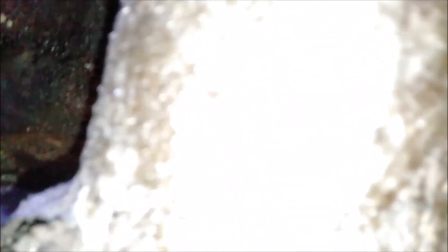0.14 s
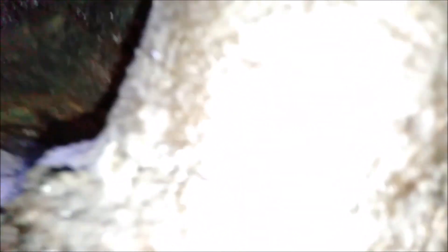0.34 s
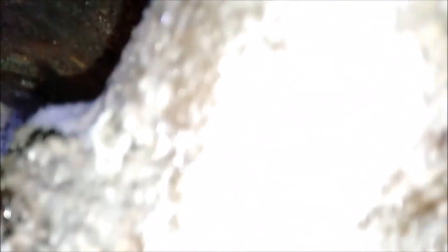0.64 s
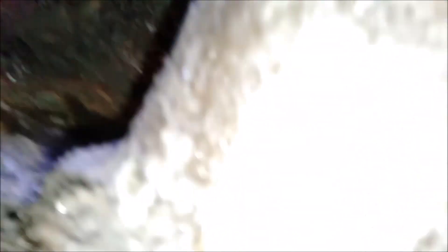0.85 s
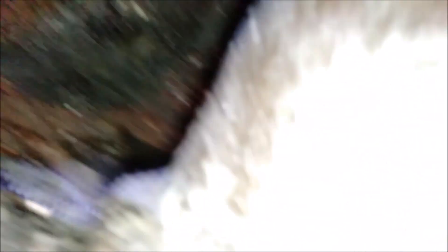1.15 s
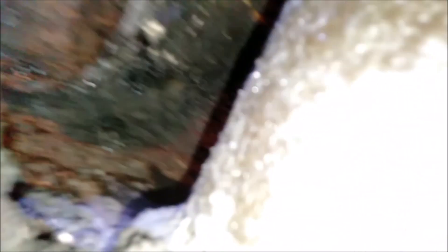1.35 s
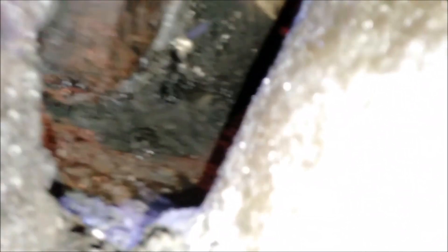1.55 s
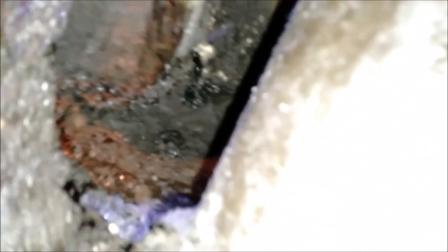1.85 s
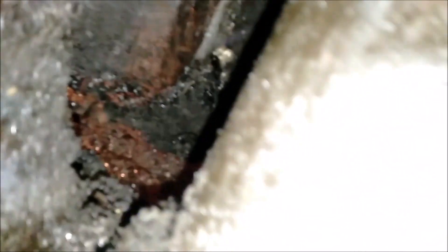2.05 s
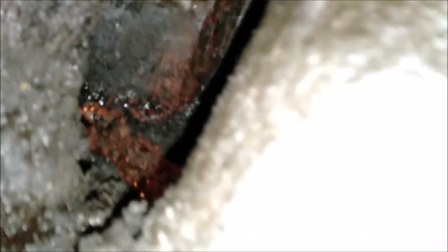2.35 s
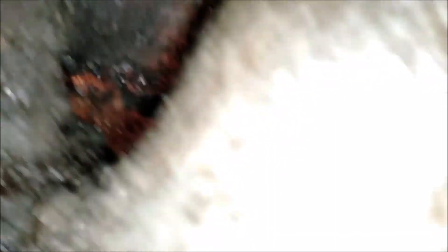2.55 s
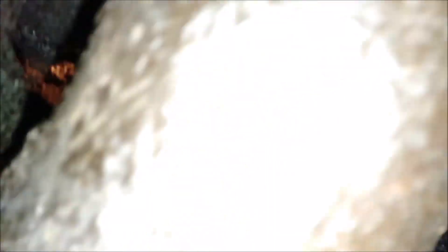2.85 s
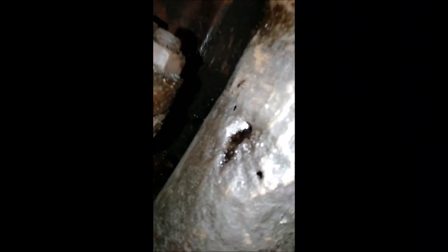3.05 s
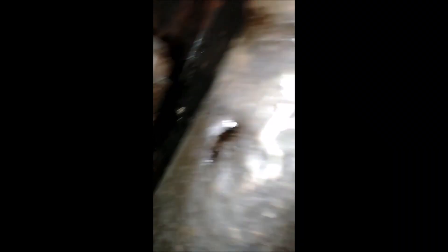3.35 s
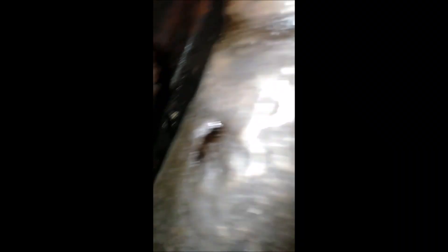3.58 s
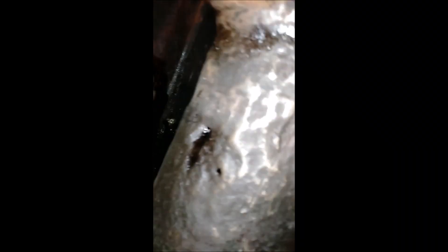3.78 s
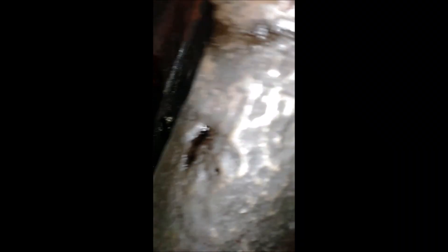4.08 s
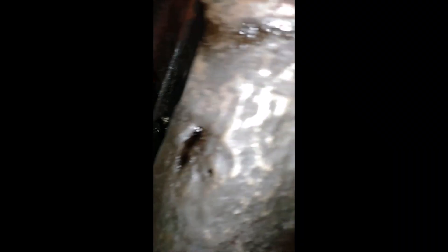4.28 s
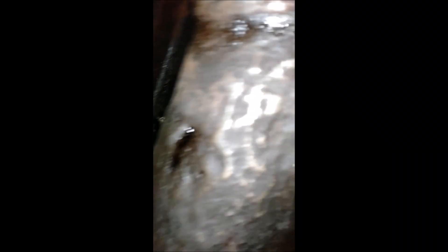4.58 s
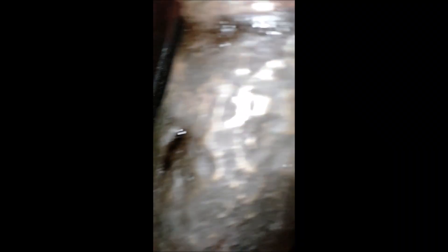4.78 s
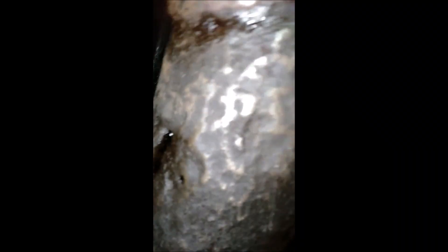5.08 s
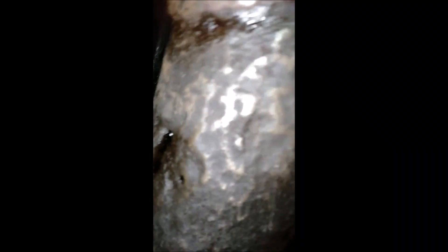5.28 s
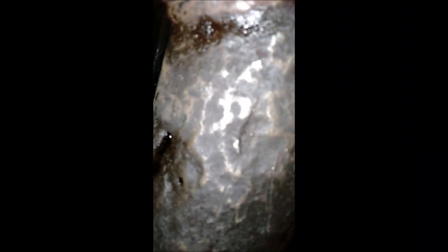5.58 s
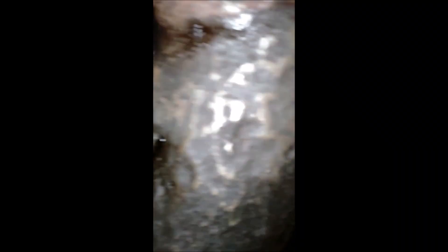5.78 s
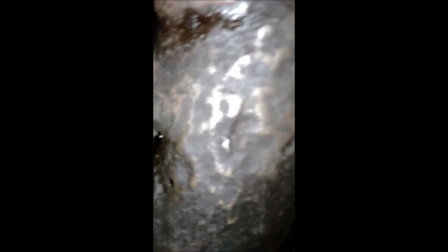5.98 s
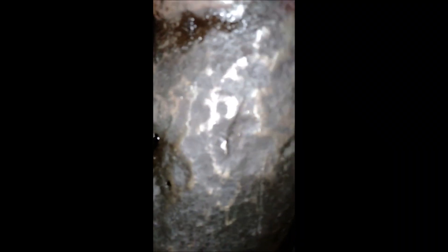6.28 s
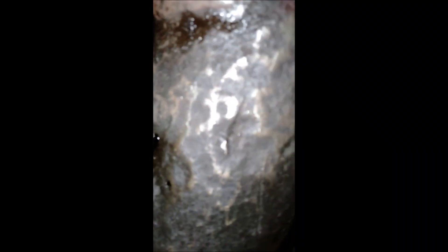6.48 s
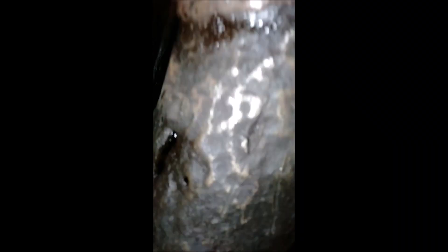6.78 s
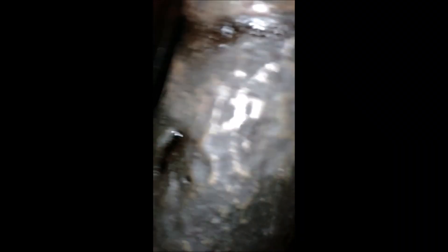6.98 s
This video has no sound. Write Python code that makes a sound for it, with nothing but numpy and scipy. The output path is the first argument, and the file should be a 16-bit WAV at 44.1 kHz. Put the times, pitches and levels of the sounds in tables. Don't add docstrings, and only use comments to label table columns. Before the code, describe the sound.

Close to machinery in a steel engine room, a six-cylinder diesel clatters fast and steadily, with a vane pump whining and thin air hissing. It breaks off with a snap. After about a quarter second of silence a click opens the same noise at quarter speed: deep, dark, throbbing rumble with dull hiss, continuing to the end.

```python
import sys
import numpy as np
from scipy import signal
from scipy.fft import rfft, irfft, next_fast_len
from scipy.io import wavfile
from scipy.ndimage import uniform_filter1d

SR = 44100
rng = np.random.default_rng(int(sys.argv[2]) if len(sys.argv) > 2 else 0)


def generate_wav(signal):
    frames = np.transpose(np.atleast_2d(signal))
    scaled = np.clip(frames, -1, 1) * 32767
    pcm = np.round(scaled).astype(np.int16)
    wavfile.write(sys.argv[1], SR, pcm)


def volts(x):
    e = np.asarray(x, float) / 20
    return 10 ** e


N = 314428
PADDED = next_fast_len(N)
CYCLE_HZ = 5.9567


def diesel(colour, slow, take, rest_db, blur_db, wander_cycles):
    strong_multiples = [(5, -38, -37, 0), (10, -39, -37, 5), (12, -34, -34, -3), (14, -35, -36, 1),
                        (18, -30, -29, -1), (20, -32, -34, 1), (21, -36, -35, 2), (24, -32, -36, 1),
                        (25, -40, -34, 5), (31, -42, -36, 3), (35, -41, -36, 3), (36, -35, -34, -3),
                        (39, -39, -37, -6), (42, -30, -29, 0),
                        (82, -34, -38, 7), (84, -31, -32, 0), (85, -36, -31, 4), (86, -46, -36, -12),
              (87, -37, -34, -7), (90, -39, -33, -4), (94, -39, -40, -3), (99, -38, -35, -2),
              (140, -44, -48, -8), (149, -46, -43, -2), (160, -43, -40, 4), (162, -43, -40, 4),
              (165, -54, -42, -3), (174, -47, -43, 0)]
    firing_lift_db, half_firing_lift_db = 5.5, 2.5
    lift_fades_at = 110.
    place_swing_db = 2.5
    k, size = np.arange(600), 2 ** 15
    phases = np.exp(2j * np.pi * rng.random(len(k)))
    turns = CYCLE_HZ / slow * np.arange(N) / SR + wander_cycles * drift(1.5 / slow)
    firing, half_firing = k % 6 == 0, k % 6 == 3
    strong = np.array(strong_multiples)
    if take == 1:
        gain_db = strong[:, 3]
    else:
        gain_db = 2 * place_swing_db * rng.standard_normal(len(strong))
    loops = []
    for place in (-.5, .5):
        uneven_db = np.clip(rng.normal(0, 2.8, len(k)), -12, 5.)
        lift_db = firing_lift_db * firing + half_firing_lift_db * half_firing
        lift_db = lift_db / (1 + (k / lift_fades_at) ** 4)
        colour_db = at_hz(colour, k * CYCLE_HZ / slow)
        level = volts(rest_db + colour_db + uneven_db + lift_db - blur_db * k / 100)
        level[strong[:, 0]] = volts(strong[:, take] + place * gain_db)
        cycle = irfft(level * (k > 2) * phases, size) * size / np.sqrt(2)
        closed = np.append(cycle, cycle[0])
        loops.append(np.interp(turns % 1, np.arange(size + 1) / size, closed))
    early, late = loops
    return early + moved(take) * (late - early)


def pump(slow, take):
    vane_tones = [
        (304.7, -41, -46, -42, -42),
        (609.4, -34, -37, -34, -42),
        (914.2, -40, -40, -32, -33),
        (1828.4, -52, -61, -52, -51),
        (2005.8, -61, -53, -58, -69),
    ]
    t, out = np.arange(N) / SR / slow, 0
    for row in vane_tones:
        early_db, late_db = row[2 * take - 1:2 * take + 1]
        level = volts(early_db + moved(take) * (late_db - early_db) + 2.1 * drift(3.5 / slow))
        out = out + np.sqrt(2) * level * np.sin(2 * np.pi * (row[0] * t + rng.random()))
    return out


def plates(x, slow):
    # centre in Hz at true speed, width in Hz, lift in dB.
    ranges = [
        (487, 63, -1),
        (782, 30, -3),
        (1207, 85, 1),
        (1390, 13, -7.5),
        (2064, 33, 3.5),
        (2400, 35, 2.5),
    ]
    hz = np.fft.rfftfreq(PADDED, 1 / SR) * slow
    lift_db = sum(db * np.exp(-((hz - centre) / width) ** 2) for centre, width, db in ranges)
    return irfft(rfft(x, PADDED) * volts(lift_db), PADDED)[:N]


def engine_room(take, slow, top_hz, roar, hiss, curves, rest_db, roar_noise_db, clatter_noise_db):
    roar_layer = (0., 0., 1.)
    clatter_layer = (-8.5, -7., 0.37)
    whir_layer = (3., 0., 0.96)
    hiss_layer = (-0.89, -1.1, 0.46)
    thin_layer = (-6., -4.5, 1.3)
    engine_db, air_db = in_time(curves)
    roar_db, clatter_db = follow(engine_db, roar_layer, take), follow(engine_db, clatter_layer, take)
    whir_db, hiss_db, thin_db = (follow(air_db, layer, take) for layer in (whir_layer, hiss_layer, thin_layer))
    low, mid, upper, high, thin = 700 / slow, 2250 / slow, 4200 / slow, 9000 / slow, top_hz / slow
    tonal = diesel(roar, slow, take, rest_db, blur_db=1.5, wander_cycles=0.00038) + pump(slow, take)
    rumble = patchy_noise(roar, 16 / slow, low, slow, shared_db=1.0, own_db=0.5)
    rattle = patchy_noise(roar, low, mid, slow, shared_db=-0.5, own_db=1.28)
    deep = rms_one(band(tonal, 0, low)) + volts(roar_noise_db) * rumble
    clatter = rms_one(band(tonal, low, mid)) + volts(clatter_noise_db) * rattle
    whir = volts(whir_db) * patchy_noise(hiss, mid, upper, slow, shared_db=0.7, own_db=0.4)
    air = volts(hiss_db) * patchy_noise(hiss, upper, high, slow, shared_db=1.07, own_db=0.8)
    thin_air = volts(thin_db) * patchy_noise(hiss, high, thin, slow, shared_db=0.7, own_db=0.9)
    loud = volts(roar_db) * rms_one(deep) + volts(clatter_db) * rms_one(clatter)
    rounded = 0.72 * np.tanh(loud / 0.66)
    return plates(rounded + whir, slow) + air + thin_air


def whistles(rows, width_hz):
    t, out = np.arange(N) / SR, 0
    for s, length, hz, db in rows:
        tone = np.sqrt(2) * np.sin(2 * np.pi * np.cumsum(hz + width_hz * drift(12.0)) / SR)
        swell = np.sqrt(np.abs(np.cos(np.pi * np.clip((t - s) / length, -.5, .5))))
        out = out + volts(db + 2.5 * drift(15.)) * tone * swell * (np.abs(t - s) < length / 2)
    return out


def patchy_noise(colour, low_hz, high_hz, slow, shared_db, own_db):
    hz = np.fft.rfftfreq(PADDED, 1 / SR)
    noise = rfft(rng.standard_normal(PADDED)) * volts(at_hz(colour, hz))
    edges = np.geomspace(low_hz, high_hz, 2 + int(3 * np.log2(high_hz / low_hz)))
    together_db = shared_db * drift(1.8 / slow)
    out = 0
    for a, b in zip(edges, edges[1:]):
        part = irfft(noise * ((hz >= a) & (hz < b)), PADDED)[:N]
        out = out + part * volts(together_db + own_db * drift(14. / slow))
    return rms_one(out)


def thin_out(x, frames):
    size = 1500
    out, window = x.copy(), np.sin(np.pi * np.arange(size) / size)
    hz = np.fft.rfftfreq(size, 1 / SR)
    for s, need_db in frames:
        i = round(s * SR) - size // 2
        lines = rfft(x[i:i + size] * window)
        hiss_level = np.median(np.abs(lines[(hz > 4000) & (hz < 7500)]))
        usual = hiss_level * np.maximum(1, 4000 / (hz + 1)) ** 2
        tall = np.abs(lines) > volts(need_db) * usual
        near_tall = uniform_filter1d(1. * tall, size=3) > 0
        change = np.where(near_tall, .5, -.88) * (hz > 2300)
        out[i:i + size] += window * irfft(lines * change, size)
    return out


def drop_bands(x, spots, slow):
    size = 1300 * slow
    out, window = x.copy(), np.minimum(1, 2 * np.hanning(size))
    for s, hz in spots:
        i = round(s * SR) - size // 2
        out[i:i + size] -= window * band(x[i:i + size], hz - 300 / slow, hz + 300 / slow)
    return out


def jump(s, height, run_up_s):
    t = np.arange(N) / SR
    return height * np.exp(np.minimum(t - s, 0) / run_up_s) * (t < s)


def moved(take):
    spans_s = {1: (.4, 2.6), 2: (3.9, 6.5)}
    return np.interp(np.arange(N) / SR, spans_s[take], [0, 1])


def follow(source_db, layer, take):
    mean_db = np.median(source_db[moved(take) % 1 > 0])
    return mean_db + layer[take - 1] + layer[2] * (source_db - mean_db)


def drift(rate_hz):
    r = np.exp(-80 * np.pi * rate_hz / SR)
    slow = signal.lfilter([1], [1, -2 * r, r * r], rng.standard_normal(N // 40 + 2002))[2000:]
    return np.interp(np.arange(N) / 40, np.arange(len(slow)), rms_one(slow))


def in_time(rows):
    s, *columns = np.transpose(rows)
    return [np.interp(np.arange(N) / SR, s, c) for c in columns]


def at_hz(points, hz):
    log_hz, db = np.transpose(points)
    return np.interp(np.log(hz + 1e-9), np.log(log_hz), db)


def rms_one(x):
    return x / np.sqrt(np.mean(x ** 2) + 1e-20)


def band(x, low_hz, high_hz):
    size = next_fast_len(len(x))
    hz = np.fft.rfftfreq(size, 1 / SR)
    return irfft(rfft(x, size) * ((hz >= low_hz) & (hz < high_hz)), size)[:len(x)]


def scene():
    # frequency in Hz, density in dB per Hz.
    roar_1 = [(11, -36.5), (18, -8.5), (81, -7), (112, -6), (160, -3), (254, -9), (277, -13), (309, -7),
              (361, -12.5), (503, -5), (685, -13), (932, -12), (1110, -15), (1770, -19), (3500, -39.5),
              (4550, -64), (7700, -120)]
    roar_2 = [(2.9, -35.5), (5.0, -11.5), (27, -2), (48, -6), (70, -7), (92, -12), (112, -7), (134, -4),
              (193, -14), (234, -12.5), (261, -14.5), (291, -15), (338, -19), (499, -23.5), (875, -49),
              (1140, -79), (1930, -120)]
    hiss_1 = [(2000, 3), (2400, -9), (2900, -13), (3500, -15), (4300, -20.5), (5300, -20.5), (6500, -15),
              (7300, -22), (8400, -27.8), (10500, -33), (13000, -30.5), (14500, -26), (15700, -18.5)]
    hiss_2 = [(500, 0.0), (560, -3), (610, -6), (680, -10), (800, -15), (1040, -17.5), (1200, -14),
              (1330, -15), (1620, -12), (1900, -20.5), (2480, -32), (3400, -31), (3950, -21.5), (4230, -19)]
    # time in seconds, engine in dB, escaping air in dB.
    curves_1 = [(0., -16.5, -43.5), (.3, -17.5, -44), (.75, -18.5, -47), (1.5, -18, -46.5),
                (2.2, -17.5, -46.5), (2.98, -18.5, -47)]
    curves_2 = [(3.33, -16.5, -39.5), (4.1, -16.5, -42), (4.6, -17, -42), (5.4, -16.5, -42),
                (5.9, -18.5, -44.5), (7.12, -19, -44)]
    # centre in seconds, length in seconds, pitch in Hz, level in dB.
    whistles_1 = [
        (.2, .7, 2440, -53),
        (.25, .6, 2950, -57),
        (1.83, .22, 5430, -56),
        (1.95, .08, 5600, -57),
        (1.36, .03, 15000, -58),
    ]
    whistles_2 = [
        (5.49, .55, 1190, -48),
    ]
    # time in seconds, level in dB over the usual hiss a line needs to survive.
    thinned_1 = [(1.302, 8.4), (1.453, 7), (1.817, 3.1), (1.943, 7.2), (2.177, 7.2), (2.583, 8.5),
                 (2.691, 5.7)]
    # time in seconds, centre in Hz.
    dropped_1 = [(.49, 12300), (.78, 11600), (1.41, 13100), (1.58, 11700), (1.755, 11600), (2.29, 13100),
                 (2.48, 12200)]
    dropped_2 = [(5.02, 3450), (5.11, 2880), (5.2, 3080), (6.17, 3450), (6.73, 3280), (6.99, 2520)]
    # time in seconds, height, run-up in seconds.
    steps = [
        (2.9944, -0.28, 0.00073),
        (3.3043, 0.37, 0.0025),
    ]
    end_1_s, start_2_s = 2.9944, 3.2671
    top_1_hz, top_2_hz, slow = 15740, 17000, 4
    t = np.arange(N) / SR

    first = engine_room(take=1, slow=1, top_hz=top_1_hz, roar=roar_1, hiss=hiss_1, curves=curves_1,
                        rest_db=-39.0, roar_noise_db=-5.0, clatter_noise_db=-0.5)
    first = thin_out(first + whistles(whistles_1, width_hz=35), thinned_1)
    first = drop_bands(first, dropped_1, 1)
    fade = np.clip((end_1_s - t) / .002, 0, 1)
    first = (first * fade + jump(*steps[0])) * (t < end_1_s)
    first = band(first, 0, top_1_hz) * (t < end_1_s + .03)

    second = engine_room(take=2, slow=slow, top_hz=top_2_hz, roar=roar_2, hiss=hiss_2, curves=curves_2,
                         rest_db=-39.0, roar_noise_db=0.5, clatter_noise_db=4.5)
    second = drop_bands(second, dropped_2, slow) + whistles(whistles_2, width_hz=14.)
    second = second - .002 + jump(*steps[1])
    rise = np.clip((t - start_2_s) / 0.0012 + .2, 0, 1) * (t >= start_2_s)
    second = band(second * rise, 0, top_2_hz / slow) * (t > start_2_s - .012)
    return (first + second)[None, :]


def top_cut(x):
    return signal.sosfilt(signal.butter(12, 17110, fs=SR, output="sos"), x)


def record(dry):
    hiss = volts(-99) * rng.standard_normal(dry.shape) * (np.abs(dry) > 0)
    return top_cut(dry + hiss)


dry = scene()
out = record(dry)
generate_wav(out)
```